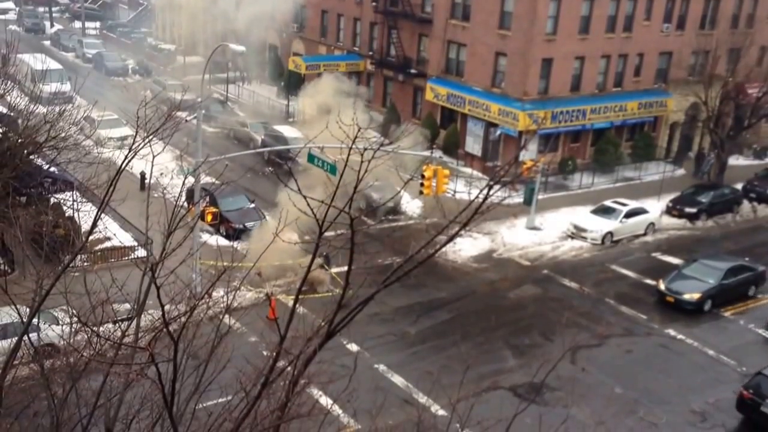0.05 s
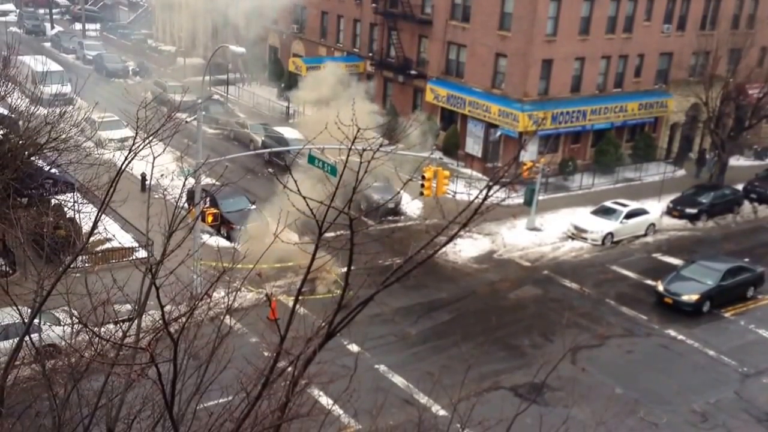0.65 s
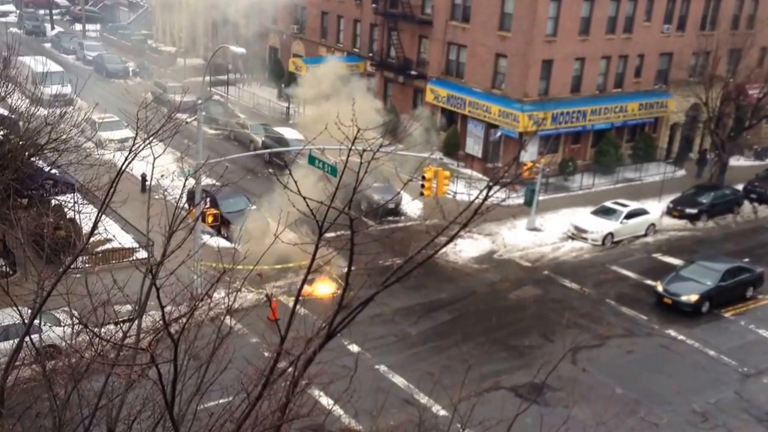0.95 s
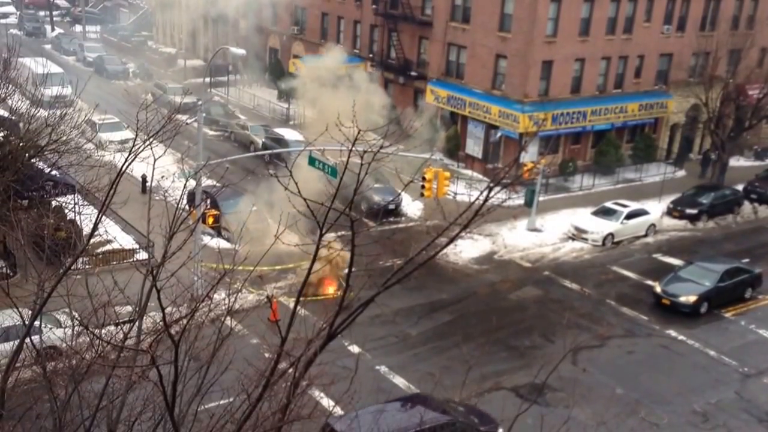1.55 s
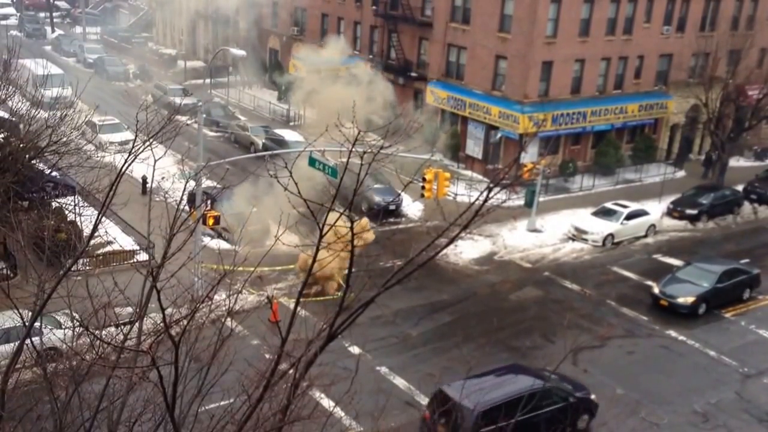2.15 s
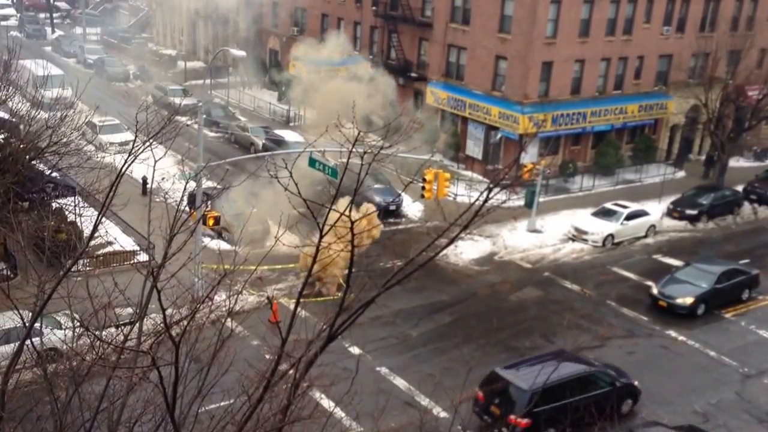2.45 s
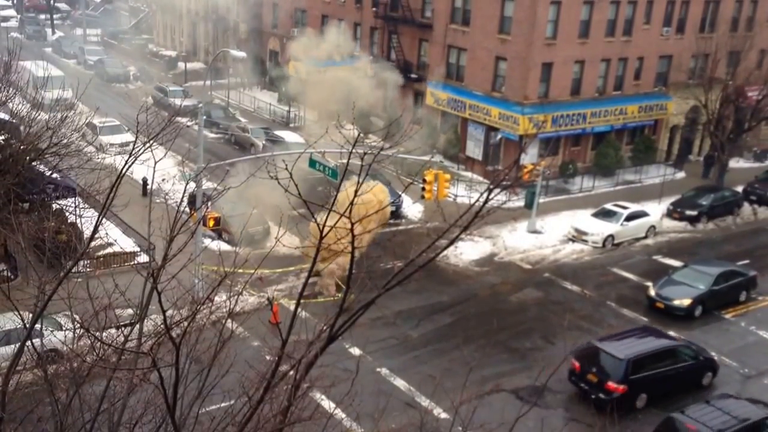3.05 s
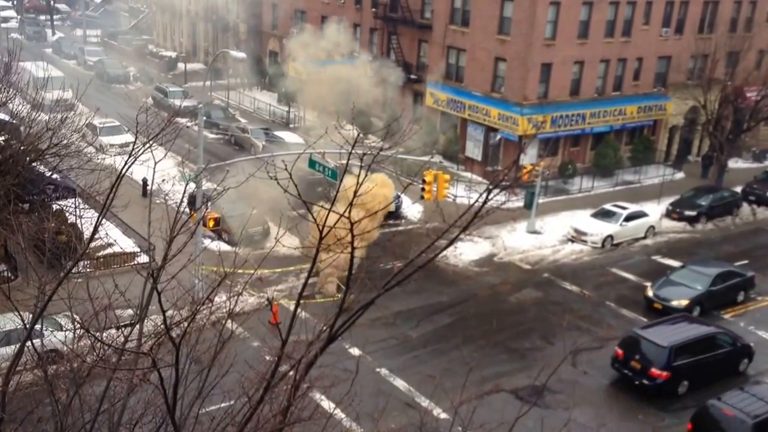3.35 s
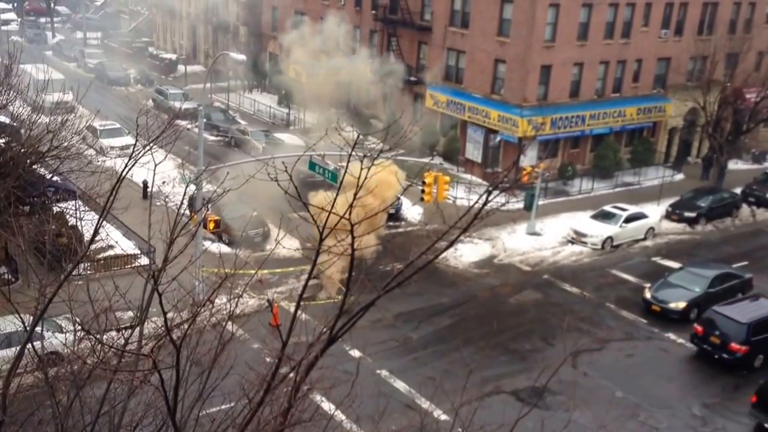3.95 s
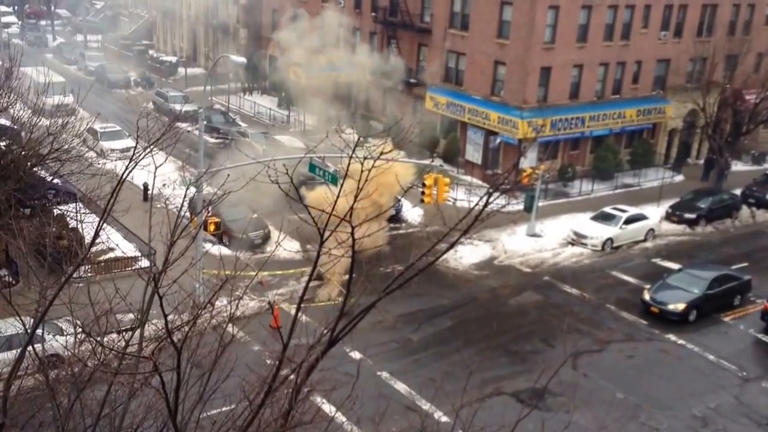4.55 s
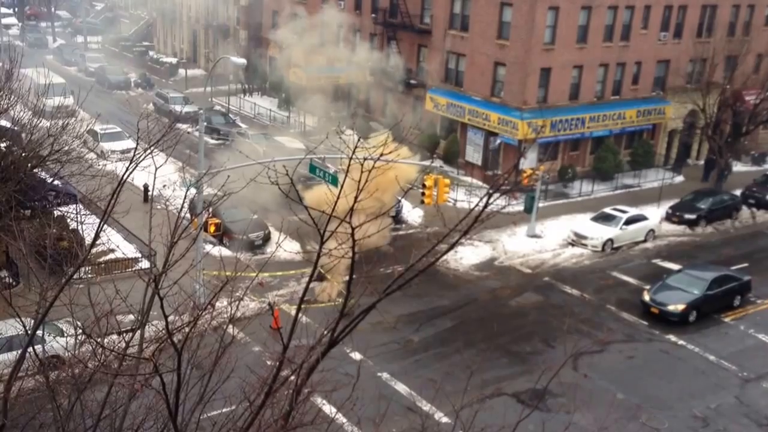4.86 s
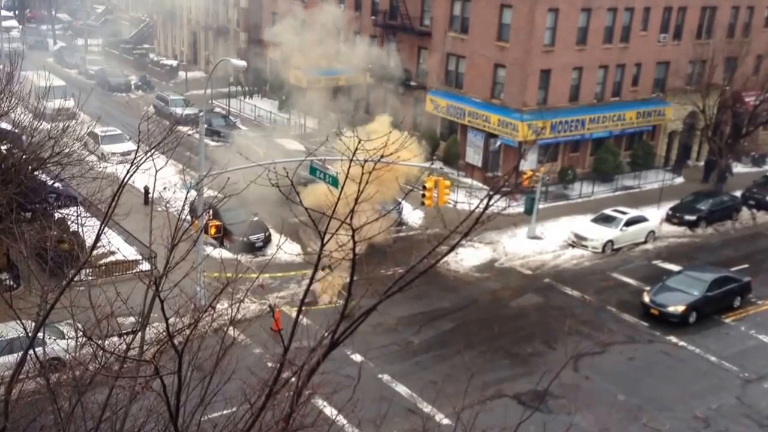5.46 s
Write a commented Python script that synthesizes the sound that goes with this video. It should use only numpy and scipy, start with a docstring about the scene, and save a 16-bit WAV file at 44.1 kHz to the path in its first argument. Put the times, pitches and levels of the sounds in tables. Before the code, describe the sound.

Heard from above a city crossing, a manhole hisses with steam while traffic hums. Suddenly a loud electric arc bursts out underground, crackling and buzzing for under a second as hot gas howls upward in pitch. A quick cluster of cracks and deep thumps follows, echoing off the house fronts. Afterwards the much quieter rush of steam remains, with slow cars passing on the wet road.

```python
"""A snowy street crossing, heard from an upper window: a power cable shorts under the road.
The arc roars and buzzes out of the manhole for most of a second while its jet of hot gas howls.
It ends in a few cracks and gas blasts that boom in the shaft and echo between the house fronts.
Steam rushes from the hole before and after; traffic drones and cars roll slowly past."""
import sys
import numpy as np
from scipy import signal
from scipy.fft import rfft, irfft, next_fast_len
from scipy.io import wavfile

SR = 44100
rng = np.random.default_rng(int(sys.argv[2]) if len(sys.argv) > 2 else 0)


def wav_out(sig):
    """Save sig, one row per channel (or a flat mono array), as 16-bit PCM at SR to the path in sys.argv[1]."""
    wavfile.write(sys.argv[1], SR, np.round(np.clip(np.atleast_2d(sig).T, -1, 1) * 32767).astype(np.int16))


N = 247531
TIME = np.arange(N) / SR
IGNITION_S, ARC_OUT_S = .9825, 1.706

# The frying top of the arc and its cracks. Each row: frequency in Hz, relative level in dB.
SIZZLE_SPECTRUM = [(3000, 1.5), (5500, 6.5), (7500, 2), (10500, -5), (12000, -10.5), (15000, -19)]


def from_db(db):
    """Decibels to gain."""
    return 10 ** (np.asarray(db) / 20)


def rms_one(x):
    """Scale to rms 1."""
    return x / np.sqrt(np.mean(x ** 2) + 1e-20)


def in_time(rows):
    """Turn rows that begin with a time in seconds into one curve per further column."""
    times, *columns = np.transpose(rows)
    return [np.interp(TIME, times, column) for column in columns]


def at_hz(points, hz):
    """Read a table on a log-frequency axis."""
    known, values = np.transpose(points)
    return np.interp(np.log(np.maximum(hz, 1)), np.log(known), values)


def drift(rate_hz):
    """A smooth random wobble, rms about 1."""
    pole = np.exp(-40 * np.pi * rate_hz / SR)
    noise = rng.standard_normal(N // 20 + 4002)  # one value per 20 samples
    slow = signal.lfilter([1], [1, -2 * pole, pole * pole], noise)[4000:]
    return np.interp(np.arange(N) / 20, np.arange(len(slow)), rms_one(slow))


def colour(x, spectrum):
    """Give a steady sound a spectrum; rms 1."""
    size = next_fast_len(N)
    gains = from_db(at_hz(spectrum, np.fft.rfftfreq(size, 1 / SR)))
    return rms_one(irfft(rfft(x, size) * gains, size)[:N])


def cut(x, hz, kind, order=2):
    """Butterworth filter."""
    sections = signal.butter(order, np.clip(hz, 10, SR / 2 - 10), kind, fs=SR, output="sos")
    return signal.sosfilt(sections, x + 1e-18)


def resonate(x, hz, width_hz, passes=1):
    """A resonance with gain 1 at its peak; more passes steepen its skirts."""
    radius = np.exp(-np.pi * width_hz / SR)
    zeros = np.array([1, 0, -1]) * (1 - radius ** 2) / 2
    poles = [1, -2 * radius * np.cos(2 * np.pi * hz / SR), radius ** 2]
    for _ in range(passes):
        x = signal.lfilter(zeros, poles, x + 1e-18)
    return x


def dying(start, t60):
    """An envelope that jumps to 1 and dies away."""
    return (TIME >= start) * from_db(-60 * np.clip((TIME - start) / t60, 0, 4))


def burn(attack_s, end_s, t60):
    """An envelope that rises from the ignition, holds until end_s and dies away."""
    return np.where(TIME < end_s, np.clip((TIME - IGNITION_S) / attack_s, 0, 1), dying(end_s, t60))


def crackle(per_s, spread_db):
    """Tiny shocks at random moments, their sizes scattered by spread_db; rms 1."""
    sizes = from_db(spread_db * np.minimum(rng.exponential(1, N), 4)) * rng.choice([-1, 1], N)
    return rms_one(sizes * (rng.random(N) < per_s / SR))


def steam(rush_db=-39, hiss_before_db=-49, hiss_after_db=-54, sag_db_per_s=.52, surge_db=.5):
    """Steam leaves the hole in a broad, gently surging rush with a brighter hiss; drops spit in it."""
    # Tone of the rush and of the hiss. Each row: frequency in Hz, relative level in dB.
    rush_spectrum = [(180, -27), (300, 2), (390, -2.5), (482, -1.5), (801, 0.5), (1090, -1.5), (1420, -1),
                     (2100, -7.5), (2730, -7.5), (2970, -11.5), (3490, -8), (4320, -13), (6100, -18.5),
                     (10500, -31.5), (15000, -37)]
    hiss_spectrum = [(1200, -47), (2300, 9), (4200, 5), (6000, -3.5), (10000, -23), (15000, -45)]
    flow = from_db(surge_db * drift(20.0) - sag_db_per_s * TIME)
    rush = colour(rng.standard_normal(N) + from_db(-24) * crackle(per_s=51, spread_db=2), rush_spectrum)
    hiss = colour(rng.standard_normal(N), hiss_spectrum)
    hiss_db = np.interp(TIME, [IGNITION_S, ARC_OUT_S], [hiss_before_db, hiss_after_db])
    return flow * (from_db(rush_db) * rush + from_db(hiss_db) * hiss)


def traffic(level_db=-40, lump_db=0.5):
    """Distant engines and tyres blend into a lumpy drone."""
    # Tone of the drone. Each row: frequency in Hz, relative level in dB.
    drone_spectrum = [(15, -34), (30, -1), (54, -10), (71, 2), (92, -5.5), (122, 2), (150, -6), (188, -0.5),
                      (215, -4.5), (390, -15.5), (580, -16), (1000, -65)]
    return from_db(level_db + lump_db * drift(6.6)) * colour(rng.standard_normal(N), drone_spectrum)


def pass_by(rows):
    """The envelope of sources that come near and go away; each falls as one over distance."""
    return np.sqrt(sum(from_db(db) ** 2 / (1 + ((TIME - peak_s) / swell_s) ** 2)
                       for peak_s, db, swell_s in rows))


def cars():
    """Exhausts drone unevenly in one low resonance; tyres hiss through wet patches."""
    # Swells of exhaust and tyres. Each row: peak time in seconds, level in dB, swell time in seconds.
    exhaust_swells = [(0.0, -40.5, 0.23), (2.45, -35, 0.025), (3.1, -40, 0.47), (4.9, -51, 0.67)]
    tyre_swells = [(2.65, -51.5, 0.49), (3.86, -45.5, 0.078)]
    exhaust = resonate(rng.standard_normal(N), hz=144, width_hz=46, passes=2)
    tyres = resonate(rng.standard_normal(N), hz=1300, width_hz=700, passes=2)
    return pass_by(exhaust_swells) * rms_one(exhaust) + pass_by(tyre_swells) * rms_one(tyres)


def swirl(x, paths=4, path_db=-7, detour_s=.004, wander_s=0.000201):
    """Sound takes several wandering paths through billowing hot gas, so peaks and notches sweep."""
    detours = np.linspace(detour_s / paths, detour_s, paths) * rng.uniform(.8, 1.2, paths)
    bent = sum((-1) ** k * np.interp(TIME - detour - wander_s * drift(2.9), TIME, x)
               for k, detour in enumerate(detours))
    return rms_one(x + from_db(path_db) * bent)


def arc(buzz_hz=119.7, waver=0.00846, flare_db=3.5, sputter_db=2.0, strike_s=0.0076, sizzle_lift_db=2.5):
    """The arc flares with each half cycle of the current, pulsing its roar, howl and sizzle."""
    # The arc's course. Each row: time in seconds, roar level in dB, sizzle level in dB before its lift.
    arc_levels = [(1.0, -19.5, -29), (1.052, -16.5, -36.5), (1.084, -16, -27.5), (1.314, -13, -28),
                  (1.436, -18, -42.5), (1.652, -18.5, -37.5), (1.67, -21, -51)]
    roar_db, sizzle_db = in_time(arc_levels)
    phase = 2 * np.pi * np.cumsum(buzz_hz * (1 + waver * drift(17.0))) / SR
    flare = from_db(flare_db * np.cos(phase) + sputter_db * drift(38))
    body = from_db(roar_db) * roar(flare)
    jet = howl(flare, strike_s)
    sparks = swirl(crackle(per_s=6300, spread_db=0) * flare)
    sizzle = from_db(sizzle_db + sizzle_lift_db) * colour(sparks, SIZZLE_SPECTRUM)
    return burn(strike_s, ARC_OUT_S, t60=0.25) * (body + sizzle + buzz(phase)) + jet


def roar(flare):
    """Bursts of shocks from the arc merge into a roar and ring in the cable vault; rms 1."""
    # Tone of the roar. Each row: frequency in Hz, relative level in dB.
    roar_spectrum = [(60, -9), (130, 10.5), (250, 8), (340, 4), (470, 5.5), (600, -9.5), (1050, 2),
                     (1450, -5.5), (1900, -3.5), (2400, -9.5), (2900, -6.5), (3400, -1), (4800, -6),
                     (6500, -17.5), (12000, -42)]
    # The vault's resonances. Each row: frequency in Hz, width in Hz, relative level in dB.
    vault_modes = [(731, 19, -25), (970, 80, -13.5), (1355, 54, -14.5), (1580, 19, -29), (1937, 25, -28),
                   (3250, 160, -23)]
    shocks = swirl(crackle(per_s=6000, spread_db=3.5) * flare)
    ringing = sum(from_db(db) * rms_one(resonate(shocks, hz, width)) for hz, width, db in vault_modes)
    return rms_one(colour(shocks, roar_spectrum) + ringing)


def howl(flare, attack_s, start_db=-18.5, sag_db_per_s=12, half_width_hz=170):
    """The jet's howl climbs as the gas heats up, shrieks, falls back and dies when the gas is spent."""
    # The howl's glide. Each row: time in seconds, pitch in Hz.
    glide = [(.98, 600), (1.08, 705), (1.2, 1100), (1.39, 1380), (1.425, 2340), (1.465, 2830), (1.5, 1270)]
    pitch_hz, = in_time(glide)
    carrier = np.exp(2j * np.pi * np.cumsum(pitch_hz) / SR)
    turbulence = rng.standard_normal(N) * flare
    gliding_band = (cut(turbulence / carrier, half_width_hz, "low") * carrier).real
    level = from_db(start_db - sag_db_per_s * (TIME - IGNITION_S))
    return level * burn(attack_s, end_s=1.54, t60=0.21) * rms_one(gliding_band)


def buzz(phase, sputter_db=5.0, gain_db=-2.5):
    """The hum of the arc; each partial sputters by itself."""
    # The hum's course. Each row: time in seconds, relative levels of fundamental and overtones in dB.
    buzz_levels = [(1.0, -10, -26.5), (1.074, -33, -36.5), (1.116, -16, -24), (1.326, -27.5, -20.5),
                   (1.476, -14, -33), (1.55, -38, -20), (1.632, -19.5, -37), (1.67, -24, -34.5)]
    # Its overtones. Each row: harmonic number, offset from the overtone level in dB.
    overtones = [(2, 2), (3, -8.5), (4, -15), (6, -31), (10, -11.5), (12, -5.5), (15, -9)]
    fundamental_db, overtone_db = in_time(buzz_levels)
    partials = [(1, fundamental_db)] + [(harmonic, overtone_db + db) for harmonic, db in overtones]
    hum = np.zeros(N)
    for harmonic, db in partials:
        level = from_db(db + gain_db + sputter_db * drift(22.0))
        hum += level * np.sqrt(2) * np.sin(harmonic * phase + rng.uniform(0, 2 * np.pi))
    return hum


def iron_frame(shake=0.0142):
    """The first blow sets the manhole frame ringing; the rushing gas shakes its pitch."""
    # The iron's modes. Each row: frequency in Hz, level in dB, time to fall 60 dB in seconds.
    iron_modes = [(528, -14, 0.26), (726, -15, 0.23), (1750, -25, 0.33), (3270, -20, 0.28),
                  (4480, -21.5, 0.12), (5180, -25, 0.078)]
    ring = np.zeros(N)
    for hz, db, t60 in iron_modes:
        phase = 2 * np.pi * np.cumsum(hz * (1 + shake * drift(71))) / SR
        ring += from_db(db) * dying(IGNITION_S, t60) * np.sin(phase)
    return ring


def blasts():
    """Burning gas gives a push followed by suction, and sets the shaft booming."""
    # Each row: start in seconds, gain in dB, length of the push in seconds, low-pass cutoff in Hz.
    gas_blasts = [(.983, -18, .002, 500), (1.002, -11.5, .002, 900), (1.408, -3, 0.0021, 300),
                  (1.645, -10, .005, 300), (1.659, -7, 0.005, 150), (1.769, -9, 0.0018, 1010),
                  (1.778, -2, 0.0044, 248), (1.794, -1, 0.00072, 406), (1.810, -7.5, 0.0022, 503),
                  (1.854, -2.5, 0.0024, 1800)]
    # The shaft's boom. Each row: frequency in Hz, relative level in dB, time to fall 60 dB in seconds.
    shaft_modes = [(61, -11.5, 0.2), (95, -7, 0.13), (134.5, -5, 0.067), (240, -14.5, 0.035),
                   (413, -18.5, 0.12), (520, -19, 0.031), (820, -10.5, 0.043)]
    out = np.zeros(N)
    age = TIME[:SR // 2]
    boom = sum(from_db(db - 60 * age / t60) * np.sin(2 * np.pi * hz * age) for hz, db, t60 in shaft_modes)
    for start_s, db, push_s, cutoff_hz in gas_blasts:
        pressure = (1 - age / push_s) * np.exp(-np.minimum(age / push_s, 20))
        start = round(start_s * SR)
        out[start:start + len(age)] += from_db(db) * cut(pressure + boom, cutoff_hz, "low")
    return out


def cracks(rise_s=0.0053):
    """Each time the arc strikes or restrikes, a short shower of shocks swells and dies."""
    # Each row: start in seconds, body level in dB, sizzle level in dB, time to fall 60 dB in seconds.
    strikes = [(0.985, -14.5, -41, 0.23), (1.075, -14, -28, 0.092), (1.184, -13, -29, 0.055),
               (1.279, -21, -22, 0.17), (1.366, -10, -20, 0.064), (1.406, -13.5, -31, 0.21),
               (1.456, -12.5, -29, 0.15), (1.527, -17.5, -24, 0.097), (1.638, -12, -29, .08),
               (1.711, -13, -22, 0.081), (1.768, -17, -31, .06), (1.778, -8.5, -22.5, 0.089),
               (1.796, -15.5, -36, 0.14), (1.855, -9.5, -28.5, .065)]
    # Tone of a crack's body. Each row: frequency in Hz, relative level in dB.
    body_spectrum = [(90, 1.5), (200, 3), (340, 6.5), (520, 7), (780, 2), (1150, -5), (1800, -3),
                     (2500, -9.5), (3400, -10.5), (5000, -12), (7000, -40), (13000, -54)]
    body_level, sizzle_level = np.zeros(N), np.zeros(N)
    for start_s, body_db, sizzle_db, t60 in strikes:
        shower = np.clip((TIME - start_s) / rise_s, 0, 1) * dying(start_s, t60)
        body_level += from_db(body_db) * shower
        sizzle_level += from_db(sizzle_db) * shower
    body = colour(swirl(crackle(per_s=12000, spread_db=1.5)), body_spectrum)
    sizzle = colour(crackle(per_s=8000, spread_db=-1.0), SIZZLE_SPECTRUM)
    return body_level * body + sizzle_level * sizzle


def outflow(level_db=-19.5):
    """Hot gas tumbles out of the shaft: a deep rumble that builds while the arc burns, then ebbs."""
    # Tone of the rumble. Each row: frequency in Hz, relative level in dB.
    rumble_spectrum = [(25, -34), (42, -13), (58, 9.5), (80, 2), (110, -8.5), (200, -8), (600, -72)]
    rumble = colour(rng.standard_normal(N), rumble_spectrum)
    return from_db(level_db) * burn(attack_s=0.36, end_s=1.58, t60=1.82) * rumble


def reflect(x, walls):
    """Each wall returns a later, quieter copy of the sound."""
    return sum(from_db(db) * np.interp(TIME - delay_s, TIME, x, left=0) for delay_s, db in walls)


def street_echo(x, tail_gain_db=-16, slap_top_hz=2200, build_s=0.0061, bass_hz=130):
    """Dull slaps from the house fronts and a diffuse tail; much of the bass escapes over the roofs."""
    # Slaps off the houses. Each row: delay in seconds, gain in dB.
    house_fronts = [(.071, -16), (.135, -19.5), (.215, -24), (.335, -26), (.41, -26)]
    # The street's ring. Each row: frequency in Hz, time to fall 60 dB in seconds.
    decay_times = [(60, 0.97), (120, 0.84), (300, 0.72), (1500, 1.92), (4000, 1.4), (12000, .3)]
    trapped = cut(x, bass_hz, "high", order=1)
    age = TIME[:2 * SR]
    edges_hz = np.geomspace(30, 16000, 10)
    tail = np.zeros(len(age))
    for low, high in zip(edges_hz, edges_hz[1:]):
        t60 = at_hz(decay_times, np.sqrt(low * high))
        tail += cut(rng.standard_normal(len(age)), [low, high], "band") * from_db(-60 * age / t60)
    tail *= (1 - np.exp(-age / build_s)) * from_db(tail_gain_db) / np.sqrt(SR / 20)
    slaps = cut(reflect(trapped, house_fronts), slap_top_hz, "low", order=1)
    return slaps + signal.fftconvolve(trapped, tail)[:N]


def far_echoes(x, top_hz=120):
    """Only the bass comes back from buildings far down the street."""
    # Each row: delay in seconds, gain in dB.
    far_buildings = [(0.189, -22), (.41, -22)]
    return reflect(cut(x, top_hz, "low"), far_buildings)


def ticks(t60=0.033, width_hz=450):
    """Short gritty ticks in the street, each ringing around one pitch."""
    # Each row: start in seconds, peak level in dB, pitch in Hz.
    street_ticks = [(2.602, -30, 1330), (2.893, -31, 1430)]
    out = np.zeros(N)
    for start_s, db, hz in street_ticks:
        tick = resonate(dying(start_s, t60) * rng.standard_normal(N), hz, width_hz, passes=2)
        out += from_db(db) * tick / np.abs(tick).max()
    return out


def scene():
    """The explosion and its echoes over a bed of steam and traffic, in mono."""
    explosion = arc() + cracks() + blasts() + iron_frame()
    bed = steam() + traffic() + cars() + ticks()
    return (explosion + street_echo(explosion) + far_echoes(explosion) + outflow() + bed)[None]


def record(dry, bass_hz=43, ceiling=0.86, top_hz=15200):
    """A small microphone loses the deep bass, rounds the highest peaks and cuts the top."""
    thin = cut(dry, bass_hz, "high", order=3)
    rounded = thin / (1 + (thin / ceiling) ** 4) ** (1 / 4)
    return signal.sosfilt(signal.ellip(12, .1, 90, top_hz, fs=SR, output="sos"), rounded)


dry = scene()
out = record(dry)
wav_out(out)
```